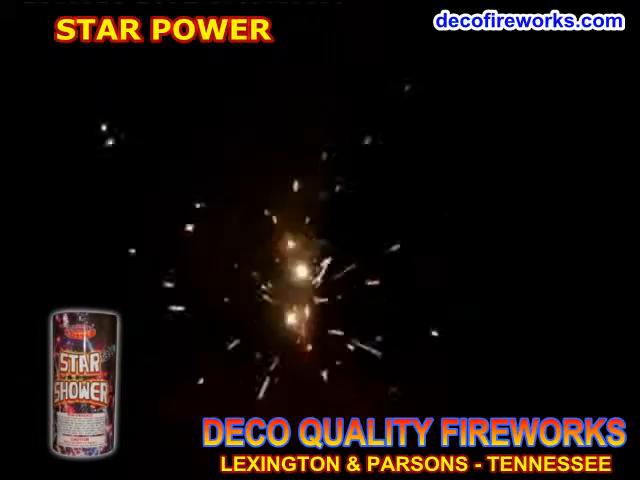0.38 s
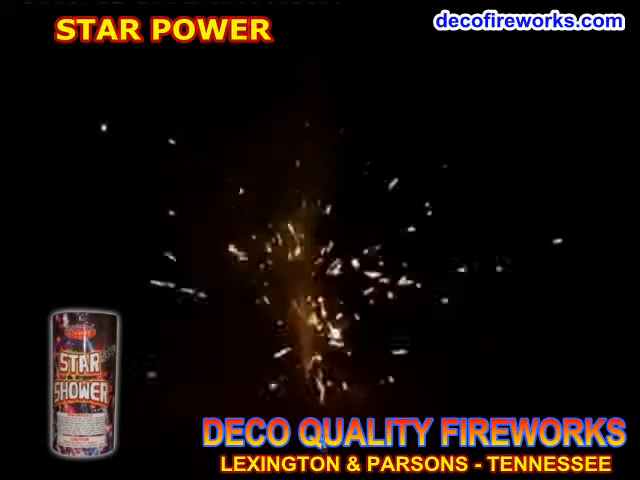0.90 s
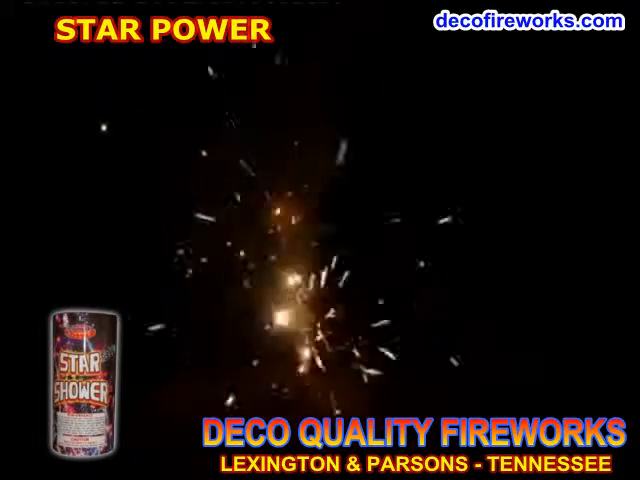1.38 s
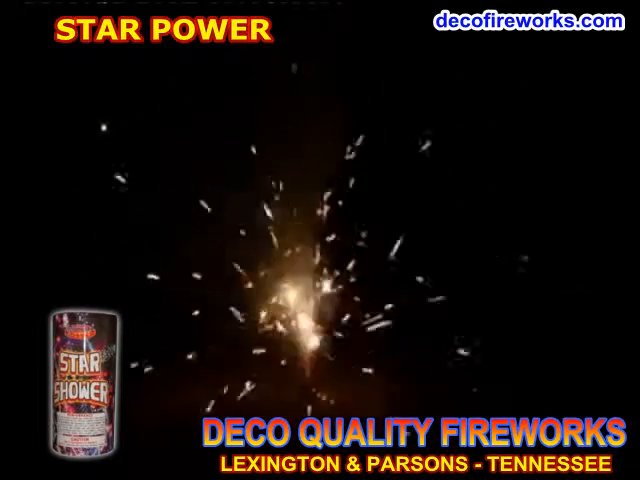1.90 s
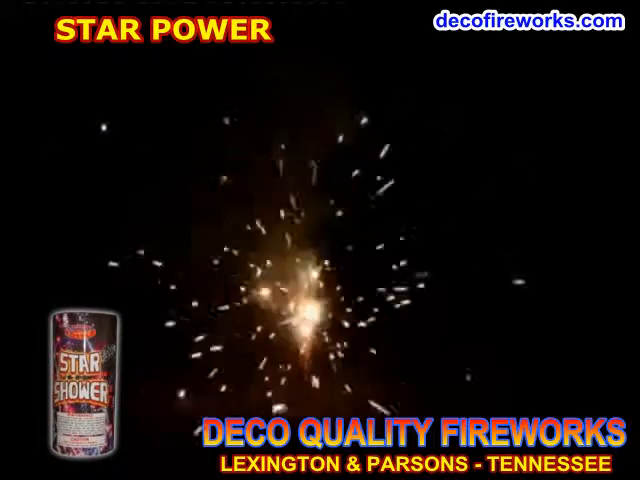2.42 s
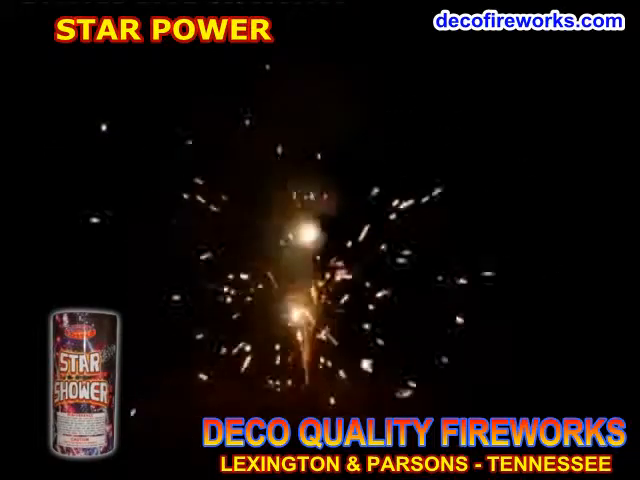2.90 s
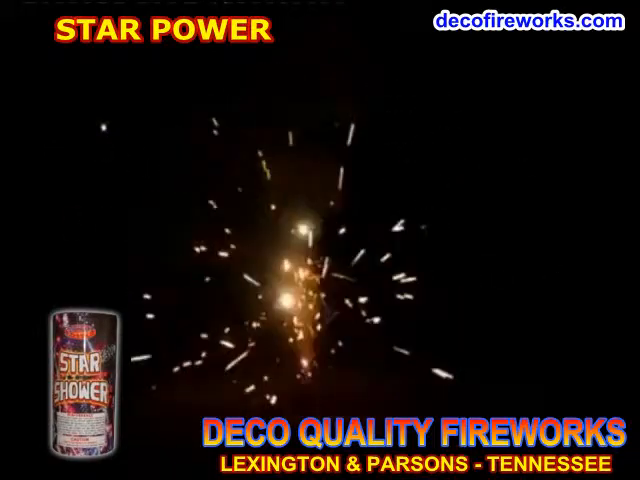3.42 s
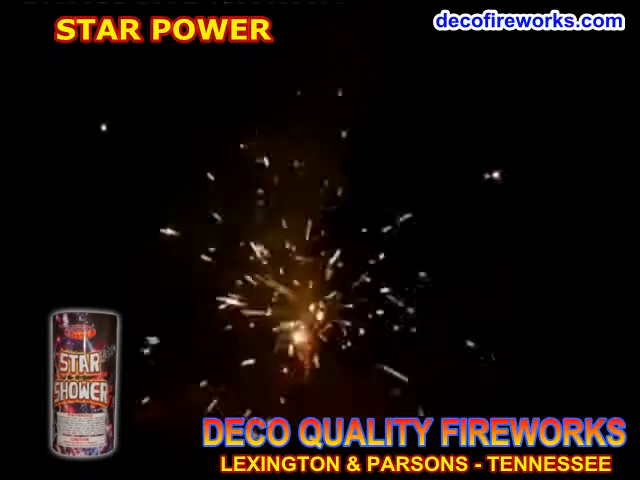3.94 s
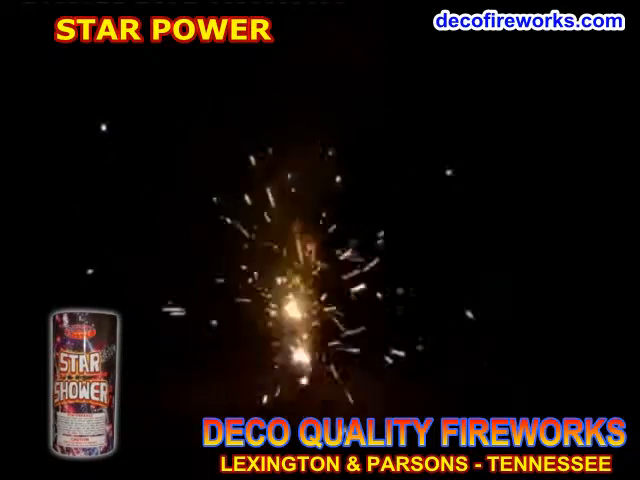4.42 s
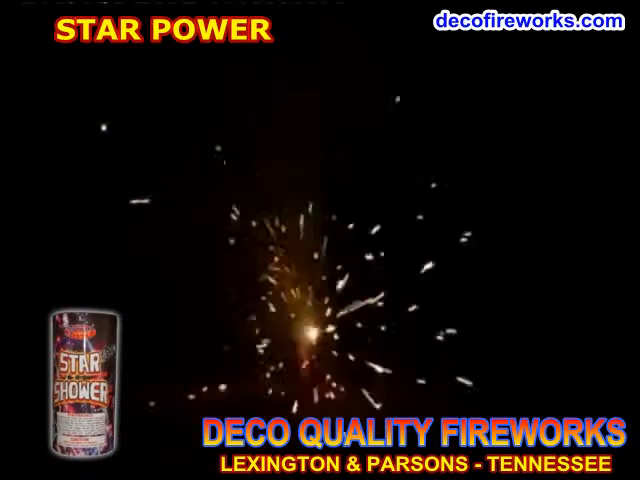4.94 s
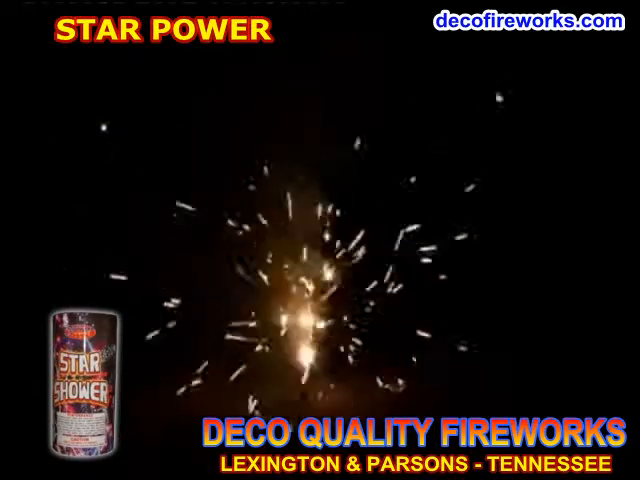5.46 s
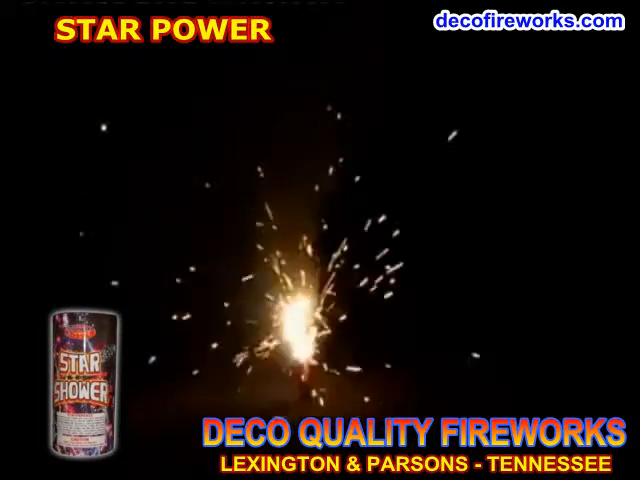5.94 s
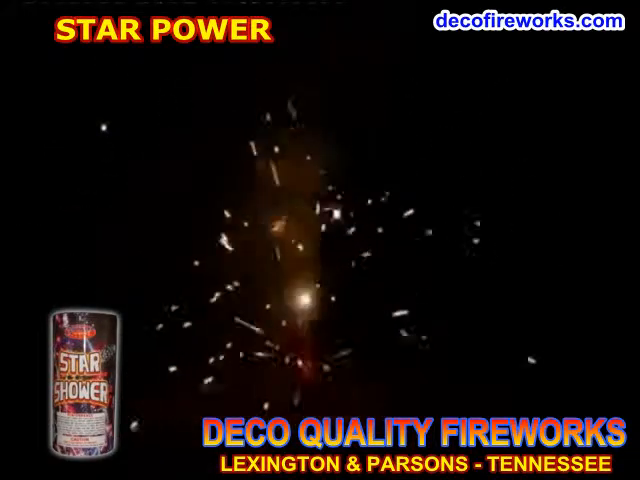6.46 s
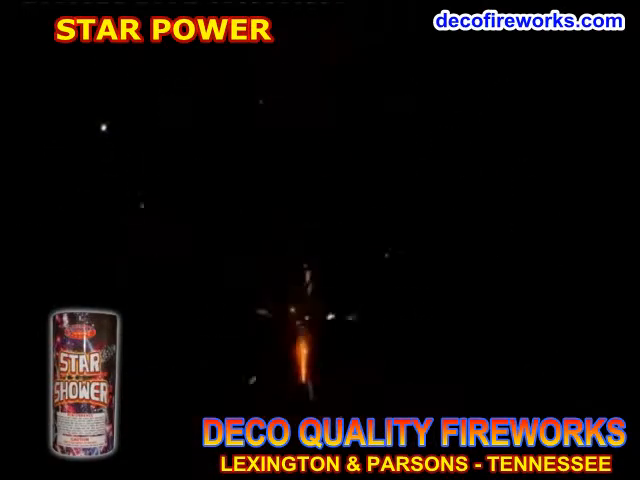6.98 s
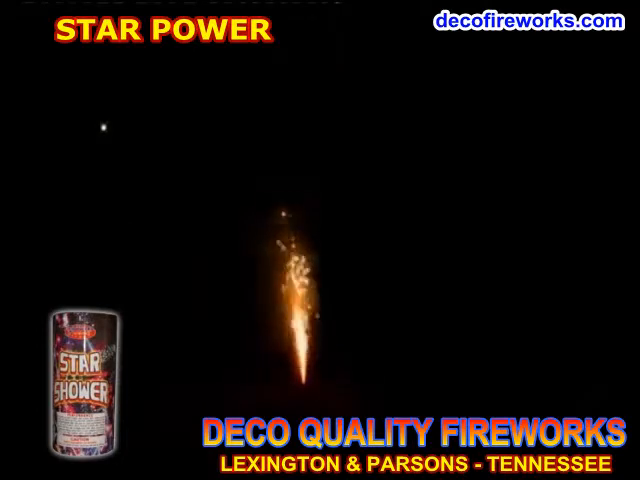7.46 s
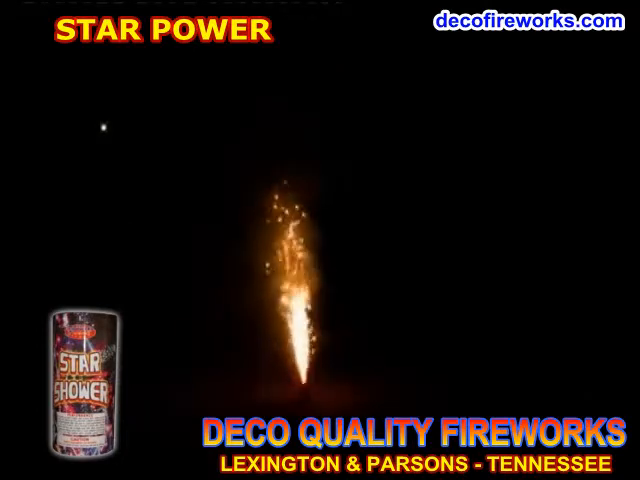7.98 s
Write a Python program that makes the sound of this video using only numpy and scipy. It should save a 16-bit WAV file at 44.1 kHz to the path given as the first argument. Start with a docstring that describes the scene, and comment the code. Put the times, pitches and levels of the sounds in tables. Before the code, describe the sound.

A ground firework crackles loudly and densely outdoors, its sharp pops echoing, then thins to stray snaps and leaves only a soft, slowly rising hiss.

```python
"""Outdoors at night, some metres from a ground fountain firework. Crackling stars burst above the tube in
sharp pops: each is a click with a thump, doubled by the ground and followed by scattered noise.
Walls near and far answer with duller copies, and a tail of shaped noise dies away in the open air.
The jet is a soft, patchy hiss, and it is all that is left when the stars run out."""
import sys
import numpy as np
from scipy import signal
from scipy.fft import rfft, irfft, next_fast_len
from scipy.io import wavfile
from scipy.ndimage import uniform_filter1d

SR = 44100
rng = np.random.default_rng(int(sys.argv[2]) if len(sys.argv) > 2 else 0)


def gain_from_decibels(decibels):
    """Convert decibel values to linear amplitude factors."""
    exponent = np.asarray(decibels, float) / 20
    return 10 ** exponent


def generate_wav(sig):
    """Save sig (samples, or channels by samples) to the path in sys.argv[1] as 16-bit PCM at SR."""
    pcm = np.round(np.clip(np.atleast_2d(sig).T, -1, 1) * 32767).astype(np.int16)
    wavfile.write(sys.argv[1], SR, pcm)


N = 357651  # length in samples


def unit(x):
    """Scale x to an rms of 1."""
    return x / np.sqrt(np.mean(x ** 2) + 1e-20)


def along(points, hz):
    """Read a curve of (pitch, value) points on a logarithmic pitch axis."""
    point_hz, value = np.transpose(points)
    return np.interp(np.log(hz + 1), np.log(point_hz + 1), value)


def filtered(x, response):
    """Filter x by multiplying its spectrum with a complex response."""
    size = 2 * next_fast_len(N // 2 + SR // 4)  # spare room for tails
    hz = np.fft.rfftfreq(size, 1 / SR)
    return irfft(rfft(x, size) * response(hz), size)[..., :N]


def causal(level_db):
    """The minimum-phase response with these levels: its energy comes as early as it can."""
    cepstrum = irfft(np.maximum(level_db, -60) * np.log(10) / 20)
    half = cepstrum.shape[-1] // 2
    cepstrum[..., 1:half] *= 2
    cepstrum[..., half + 1:] = 0
    return np.exp(rfft(cepstrum))


def bump(hz, centre_hz, width_hz, gain):
    """A response of 1 that a resonance raises or, with negative gain, lowers."""
    return 1 + gain * 1j * hz * width_hz / (centre_hz ** 2 - hz ** 2 + 1j * hz * width_hz)


def spread(pair, alike):
    """Mix two unrelated signals into a left and right of given likeness at each pitch."""
    def mid_and_side(hz):
        turn = np.arccos(np.clip(along(alike, hz), -1, 1)) / 2
        return np.array([np.cos(turn), np.sin(turn)])
    mid, side = filtered(pair, mid_and_side)
    return np.array([mid + side, mid - side])


def clicks(start_s, size):
    """A train of one-sample impulses."""
    return np.bincount(np.round(start_s * SR).astype(int), size, minlength=N + SR)[:N]


# stars crackling on with no long break: start_s, length_ms, level_db (relative)
CRACKLE_VOLLEYS = [(.002, 59, -16), (.092, 87, -12.5), (.189, 92, -12), (.302, 22, -16.5), (.34, 35, -10.5),
                   (.417, 11.8, -18.5), (.445, 18.5, -14), (.478, 40.3, -15.5), (.537, 193, -12.5),
                   (0.7647, 8.2, -11.5), (0.7976, 195, -13), (1.0195, 16, -12.5), (1.0716, 43.5, -11.5),
                   (1.149, 67, -14.5), (1.229, 48, -13), (1.291, 17, -13.5), (1.348, 15.6, -15.5),
                   (1.381, 53, -13.5), (1.452, 122, -13), (1.591, 107, -13), (1.731, 75, -12),
                   (1.826, 90, -10.5), (1.934, 385, -13), (2.3514, 182, -12.5), (2.543, 170, -14),
                   (2.7474, 44, -13), (2.8108, 558, -13), (3.395, 6.5, -16), (3.419, 12, -13),
                   (3.4505, 65, -12), (3.53, 13.6, -7), (3.5717, 83, -14.5), (3.663, 36, -9.5),
                   (3.714, 87, -12), (3.83, 81, -11), (3.9386, 147, -12.5), (4.0997, 68, -12.5),
                   (4.189, 108, -13.5), (4.314, 9.2, -11.5), (4.343, 5, -12), (4.431, 19, -12.5),
                   (4.5, 12, -12), (4.5299, 68, -12.5), (4.6, 320, -13.5), (4.891, 105, -12.5),
                   (5.022, 69, -13), (5.1444, 115, -15), (5.27, 12.4, -8.5), (5.304, 30, -15.5),
                   (5.354, 3, -13.5), (5.3686, 51, -13.5), (5.439, 46.6, -11), (5.503, 109, -11),
                   (5.639, 15.7, -7), (5.674, 183, -13), (5.912, 28.5, -8.5), (6.0023, 9.7, -10),
                   (6.028, 130, -12.5), (6.171, 92, -10.5), (6.268, 211, -14), (6.493, 100, -14.5)]
# single stars that burst in a break or as the charge runs out: start_s, ground_echo_ms, level_db (relative)
LONE_STARS = [(.075, 1.6, -8), (4.3974, 1, -13.5), (4.4234, 2.8, -18), (4.468, 1.8, -15), (5.111, 2, -9.5),
              (5.8687, 1.7, -9.5), (5.8888, 2.8, -4), (5.9771, 1.8, -8), (6.6065, 2.1, -8),
              (6.629, 0.73, -12), (6.6354, 1.9, -13), (6.6535, 1.9, -16), (6.667, 3.5, -5.5),
              (6.68, 1.1, -13.5), (6.7338, 1.03, -9.5), (6.738, 3, -13.5), (6.7598, 1.1, -11.5),
              (6.7843, 1.4, -14.5), (6.7867, 1.58, -18), (6.812, 1.15, -10), (6.818, 0.64, -10.5),
              (6.879, .89, -16), (6.9908, 2.8, -10), (7.067, 2.6, -26), (7.0716, 1.2, -19),
              (7.1004, 1.23, -15.5)]


def pops():
    """Time, size and ground delay of every pop: a volley is clusters at uneven gaps, split by short pauses."""
    gap_ms, size_spread_db = 3.7, 2.5  # mean gap inside a cluster; sizes vary up or down by this much
    pause_share, pause_ms = 0.1, 8  # share of gaps that stretch into a pause; mean time added
    cluster_db, opener_db = 2, 2  # clusters vary up or down; the pop after a pause is stronger
    start_s, length_ms, level_db = np.transpose(CRACKLE_VOLLEYS)[..., None]
    draw = rng.random((len(CRACKLE_VOLLEYS), 200, 6))

    pause = draw[..., 3] < pause_share
    gaps = gap_ms * (0.25 + 2.2 * draw[..., 0] ** 2)
    gaps = gaps + pause * pause_ms * (0.5 + draw[..., 4])
    after_ms = np.cumsum(gaps, axis=1)
    after_ms -= after_ms[:, :1]  # the first pop opens the volley

    # every pop shares the random level of the pop that opened its cluster
    opener = np.maximum.accumulate(pause * np.arange(pause.shape[1]), axis=1)
    cluster = 2 * np.take_along_axis(draw[..., 5], opener, axis=1) - 1
    pop_db = level_db + cluster_db * cluster + opener_db * pause
    pop_db = pop_db + size_spread_db * (2 * draw[..., 1] - 1)
    echo_ms = 0.8 + 2.2 * draw[..., 2]  # higher stars echo later

    live = after_ms <= length_ms
    lone_s, lone_echo_ms, lone_db = np.transpose(LONE_STARS)
    all_s = np.r_[lone_s, (start_s + after_ms / 1000)[live]]
    all_sizes = gain_from_decibels(np.r_[lone_db, pop_db[live]])
    all_echo_ms = np.r_[lone_echo_ms, echo_ms[live]]
    return all_s, all_sizes, all_echo_ms / 1000


# suction phase of a large and a small blast, as a resonance: pitch_hz, width_hz, gain_db
BLAST_THUMPS = [(997, 1040, 5.5), (1785, 1180, 8.5)]


def blasts(start_s, size, echo_s):
    """Each pop is a click with its own thump, heard straight and again off the ground."""
    pan_db, ground_hz = 3, 5000  # most a pop leans to each side; the ground dulls sound above this pitch
    mirror = np.array([[1], [-1]])  # left and right get opposite shifts
    pan, ground_shift = rng.uniform(-1, 1, (len(start_s), 2)).T[:, None] * mirror
    small = rng.random(len(start_s))  # each pop blends the large and the small blast
    heard = 0
    for share, (thump_hz, width_hz, gain_db) in zip([1 - small, small], BLAST_THUMPS):
        direct = np.array([clicks(start_s, share * size * gain_from_decibels(pan_db * p)) for p in pan])
        # the rough ground sends its echo to left and right at slightly different times
        ground = np.array([clicks(start_s + echo_s + 0.00009 * g, share * size) for g in ground_shift])
        both = direct + filtered(ground, lambda hz: 1 / (1 + 1j * hz / ground_hz))
        heard = heard + filtered(both, lambda hz: bump(hz, thump_hz, width_hz, gain_from_decibels(gain_db)))
    # negative first swing, hollow near 3 kHz from the front
    return -filtered(heard, lambda hz: bump(hz, 2870, 2000, -0.27))


# the parts of the scattered sound after a pop: t60_s (time to fall 60 dB), level_db (relative), top_hz
YARD_SCATTER = [(.018, -4, 20000), (.07, -10.5, 20000), (.2, -17, 3040)]
# how alike left and right are in the scattered sound: pitch_hz, likeness (0 to 1)
SCATTER_ALIKE = [(60, 0), (500, 0.77), (1500, 0.5), (3000, 0.36), (6000, 0.82), (10000, 0.96)]


def scatter(start_s, size):
    """Noise scattered by the yard dies after each pop, the long part duller; some noise is smeared ahead of it."""
    thin_hz = 1500  # small things scatter mostly treble, so less is kept below this pitch
    t = np.arange(SR // 4) / SR
    smear_ahead = gain_from_decibels(-5.5 - 60 * t[300:0:-1] / 0.0098) ** 2  # power of the noise ahead of a pop
    heard = 0
    for part, (t60_s, level_db, top_hz) in enumerate(YARD_SCATTER):
        decay = gain_from_decibels(level_db - 60 * t / t60_s) ** 2
        shape = np.r_[smear_ahead * (part == 0), decay]  # the smear is added once, with the first part
        power = signal.fftconvolve(clicks(start_s, size ** 2), shape)[len(smear_ahead):][:N]
        noise = np.sqrt(np.abs(power)) * spread(rng.standard_normal((2, N)), SCATTER_ALIKE)
        heard = heard + filtered(noise, lambda hz: 1 / (1 + 1j * hz / top_hz))
    return filtered(heard, lambda hz: (0.39 + 1j * hz / thin_hz) / (1 + 1j * hz / thin_hz))


def stars():
    """The crackle near the tube: bursting stars and the noise around each pop."""
    start_s, size, echo_s = pops()
    return blasts(start_s, size, echo_s) + gain_from_decibels(-10.5) * scatter(start_s, size)


# wall echoes, one row each: level_db (relative to the crackle), top_hz
WALL_ECHOES = [(-13, 16000), (-16, 7800), (-27, 4000), (-31, 5300), (-21.5, 4700)]
# when each wall answers, on the left: delay_s
WALL_DELAYS = [.0255, .186, .408, .435, .462]


def walls(crackle):
    """Duller copies come back from buildings; the right side hears each a little later."""
    def answer(hz):
        side_s = np.array([[0], [0.0004]])
        total = 0
        for delay_s, (level_db, top_hz) in zip(WALL_DELAYS, WALL_ECHOES):
            delayed = np.exp(-2j * np.pi * hz * (delay_s + side_s))
            total = total + gain_from_decibels(level_db) * delayed / (1 + 1j * hz / top_hz) ** 2
        return total
    return filtered(crackle, answer)


# how long the open-air tail lasts: pitch_hz, t60_s (time to fall 60 dB)
OPEN_AIR_TAIL = [(100, 0.23), (1500, 1.1), (5000, 1.87), (10000, 0.11)]


def distance(crackle):
    """The open-air tail: noise in which each pitch dies at its own speed."""
    hz, t, cells = signal.stft(rng.standard_normal((2, SR)), SR, nperseg=256)
    fading = cells * gain_from_decibels(-60 * t / along(OPEN_AIR_TAIL, hz)[:, None])
    tail = signal.istft(fading, SR, nperseg=256)[1]
    return signal.fftconvolve(crackle, tail / np.linalg.norm(tail[0]), axes=1)[:, :N]


# colour of a pop at the microphone: pitch_hz, level_db (relative, per Hz)
POP_COLOUR = [(15, -29.5), (25, -16), (70, -15.5), (202, -3.5), (335, -9.5), (540, -0.5), (731, -8.5),
              (894, -5), (1680, -4.5), (3230, -6.5), (4160, -6), (9310, -3), (10300, -2.5), (13400, -13),
              (22000, -120)]
# how the pops lean to one side: pitch_hz, left_over_right_db
POP_LEAN = [(60, -1.5), (220, -1), (790, 2.5), (2860, 0.0), (10400, 1)]


def blast_colour(crackle):
    """Give every click and echo the spectrum of a blast, leaning a little to one side."""
    def colour(hz):
        sides = np.array([[0.5], [-0.5]])
        return causal(along(POP_COLOUR, hz) + along(POP_LEAN, hz) * sides)
    return filtered(crackle, colour)


# loudness of the hiss over time: time_s, level_db (rms)
JET_LEVEL = [(0, -44), (7.3, -47.5), (7.55, -45.5), (7.8, -42.5), (8.11, -41.5)]
# colour of the hiss: pitch_hz, level_db (relative, per Hz)
JET_COLOUR = [(15, -30), (25, -4.5), (80, -12), (200, -8.5), (550, -8.5), (1200, -10.5), (2500, -8),
              (3700, -14), (8500, -8.5), (11000, -16)]
# how alike left and right are in the hiss: pitch_hz, likeness (0 to 1)
JET_LIKENESS = [(60, 0.99), (330, 0.88), (1860, 0.6), (10400, 0.72)]


def jet():
    """Burning gas hisses from the tube: coloured noise in soft patches of time and pitch."""
    patchy_db = 1.4  # rms of the patches
    cells = signal.stft(rng.standard_normal((2, N)), nperseg=512)[2]
    patches = uniform_filter1d(rng.standard_normal(cells.shape[1:]), 6, 0)  # smooth over pitch
    patches = uniform_filter1d(patches, 10, 1)  # smooth over time
    pair = signal.istft(cells * gain_from_decibels(patchy_db * unit(patches)), nperseg=512)[1][:, :N]
    hiss = filtered(spread(pair, JET_LIKENESS), lambda hz: gain_from_decibels(along(JET_COLOUR, hz)))
    level_db = np.interp(np.arange(N) / SR, *np.transpose(JET_LEVEL))
    return gain_from_decibels(level_db) * unit(hiss)


def scene():
    """Crackle with its echoes, coloured as a blast, over the jet."""
    near = stars()
    heard = near + walls(near) + gain_from_decibels(-15.5) * distance(near)
    return gain_from_decibels(20.5) * blast_colour(heard) + jet()


def band_limit(x):
    """A steep low-pass at the top of the band."""
    return signal.sosfilt(signal.butter(12, 10980, fs=SR, output="sos"), x)


def record(dry):
    """Loud peaks clip softly, deep bass is slightly thinned and the treble ends at a steep band limit."""
    ceiling, bass_hz, top_hz = 0.6, 100, 10391
    bent = dry / (1 + np.abs(dry / ceiling) ** 4) ** (1 / 4)

    def band(hz):
        thin_bass = (0.95 + 1j * hz / bass_hz) / (1 + 1j * hz / bass_hz)
        return thin_bass / (1 + (hz / top_hz) ** 260)
    mix = filtered(bent, band)
    return band_limit(mix)


dry = scene()
out = record(dry)
generate_wav(out)
```